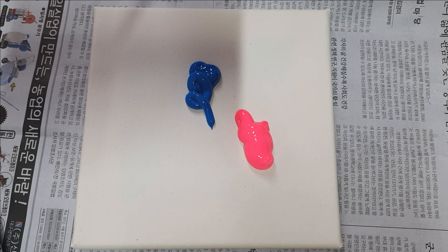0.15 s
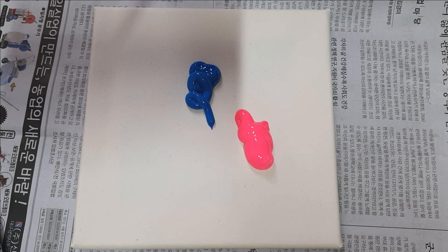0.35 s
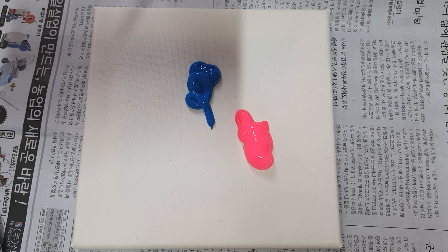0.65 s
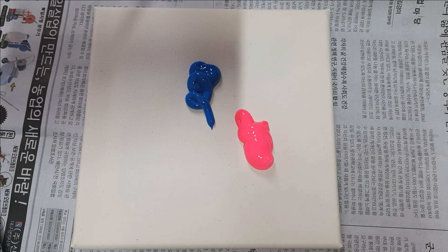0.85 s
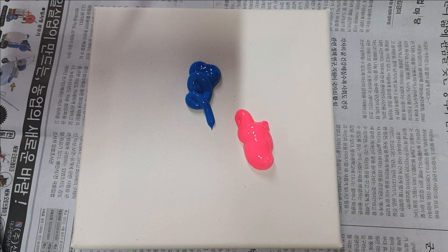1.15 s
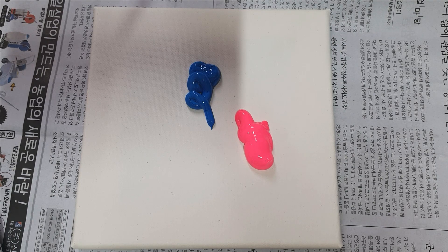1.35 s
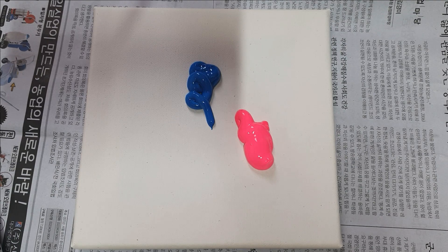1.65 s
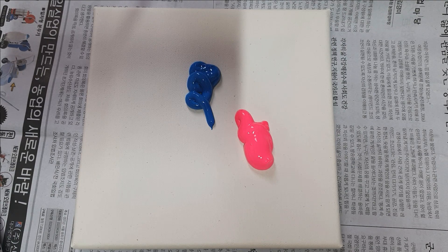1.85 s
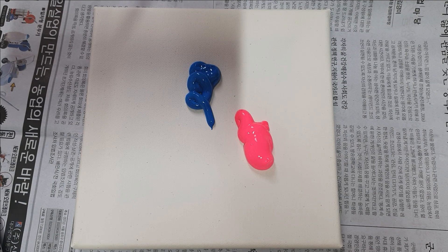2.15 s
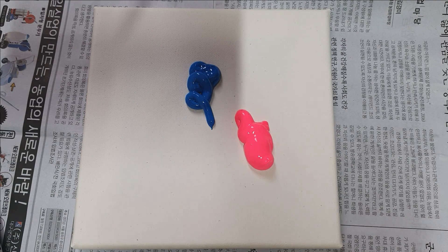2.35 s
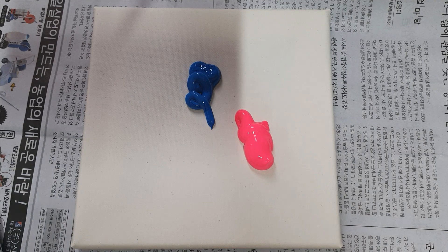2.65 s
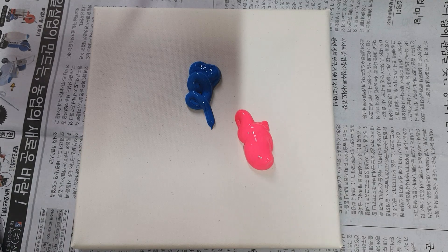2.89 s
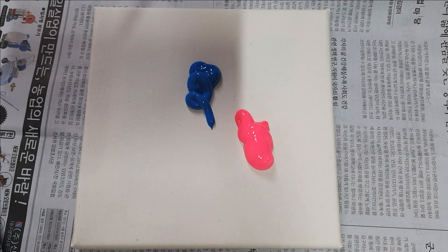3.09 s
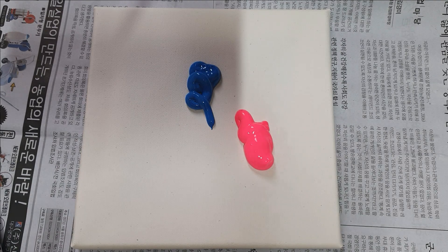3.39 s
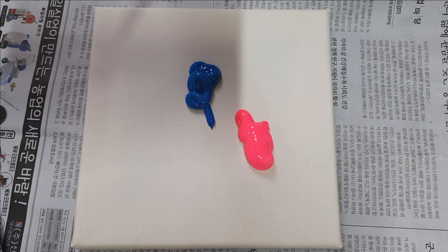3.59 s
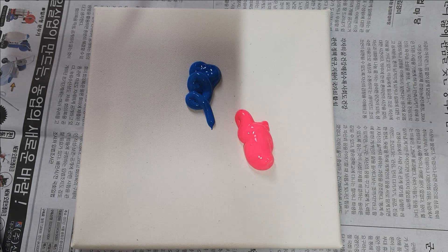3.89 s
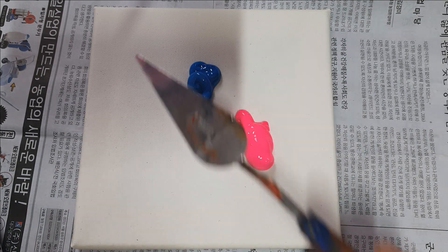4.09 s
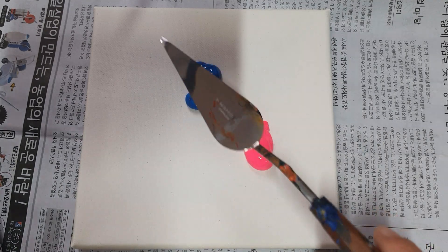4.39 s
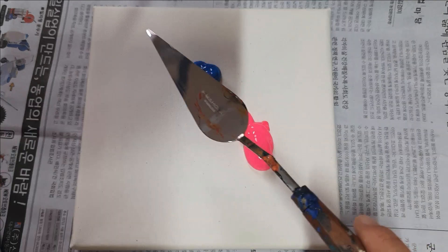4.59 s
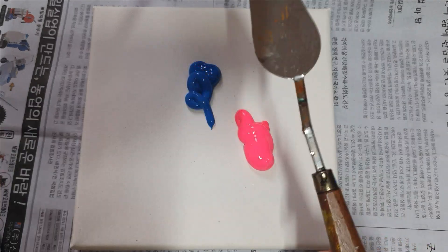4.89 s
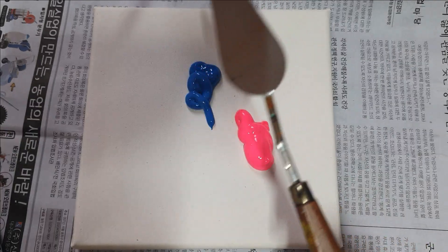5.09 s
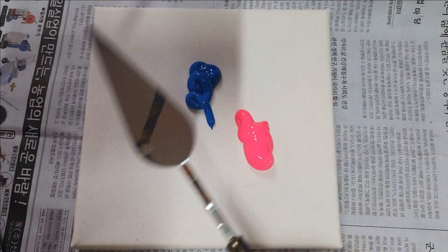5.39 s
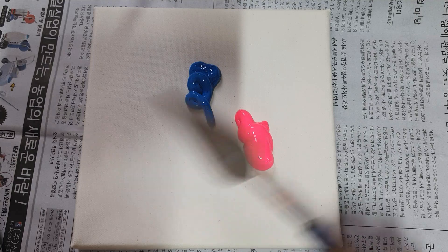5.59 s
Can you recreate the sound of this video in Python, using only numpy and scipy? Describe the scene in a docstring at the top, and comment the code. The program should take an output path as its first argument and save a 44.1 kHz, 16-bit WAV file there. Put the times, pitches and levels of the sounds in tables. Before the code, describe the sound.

A fading metallic clink opens, then thin steel palette knives with wooden handles knock and chatter together in irregular clusters, with tiny scrapes and soft desk thuds. After a short pause the hits get sharper and louder, then stop. Close stereo phone microphone, knives nearer the right, small quiet room with low hum and hiss.

```python
"""A fading clink is heard first; then wooden-handled steel palette knives knock on a desk, right of a phone.
Each knock is a short chatter of contacts exciting the damped modes of handles and blades; some blades ring on.
Blades slide as dense contacts exciting the same modes, fingers brush as filtered noise, the desk booms in
low modes. A small quiet room adds a noise tail, a low hum and the microphones' own hiss."""
import sys
import numpy as np
from scipy import signal
from scipy.fft import rfft, irfft
from scipy.io import wavfile
from scipy.ndimage import uniform_filter1d

SR = 44100
rng = np.random.default_rng(int(sys.argv[2]) if len(sys.argv) > 2 else 0)


def to_wav(s):
    """Save 16-bit WAV."""
    ch = np.atleast_2d(s).T  # columns
    pcm = np.round(np.clip(ch, -1, 1) * 32767)  # PCM
    wavfile.write(sys.argv[1], SR, pcm.astype(np.int16))


N = 253134  # length in samples

# Steel meeting steel. Each row: start in seconds, opening level in dB, contact pitch in Hz, handle pitch in Hz,
# handle level in dB over the contact, treble level in dB over the contact, chatter time constant in ms.
KNOCKS = [(.142, -49.5, 3250, 1700, 3, 4.5, 4), (0.216, -39, 2560, 1500, -4, -9.5, 5.7),
          (.227, -40, 3407, 1110, 8.5, -3, 22), (.239, -30, 3546, 1260, 3.5, -0.5, 5.3),
          (.397, -42.5, 3540, 1800, 8, -4, 5.8), (.434, -48.5, 3640, 1140, -4, -16, 3.7),
          (.493, -48, 3140, 1770, -13, -34, 1.2), (0.514, -35, 1630, 1700, 12, -23.5, 0.95),
          (.546, -38.5, 3900, 1520, -5, -4.5, 11), (.766, -55.5, 3660, 1760, 5, -9, 5),
          (.817, -62.5, 3400, 1570, -4, 1, 3), (0.859, -31, 3480, 1580, -4, 0.5, 3.3),
          (.877, -33, 2710, 1670, 2, 4.5, 6.5), (1.251, -27.5, 2600, 1260, -4, -1, 3.7),
          (1.277, -43, 2540, 1800, -4, -1, 2.5), (1.394, -27, 2585, 1800, -6, -2, 3.1),
          (1.536, -33, 2676, 1770, -13, -6, 2.1), (1.721, -34.5, 3463, 1150, -4, 2.5, 7.4),
          (1.784, -32, 3450, 1100, 9, 2, 3.3), (1.862, -36.5, 2670, 1440, 16, 8, 8.8),
          (1.876, -37, 3330, 1800, 1, -12, 2.4), (1.986, -56.5, 1800, 1810, 7, -10, 3),
          (2.675, -16.5, 3654, 1550, 1, -4.5, 0.49), (2.85, -26, 3430, 1770, 0.5, -1, 2.35),
          (2.995, -23.5, 3605, 1500, 2, -7, 7), (3.148, -17.5, 4630, 1920, 3.5, -6.5, 2.1),
          (3.229, -47, 3000, 1140, -7, 0, 3.4), (3.285, -31.5, 3550, 1670, 11, 1.5, 5.2),
          (3.293, -35, 2540, 1480, 2, -6, 2.7), (3.324, -41, 4680, 1700, -2, 14, 16.5),
          (3.514, -21.5, 4490, 1730, -5.5, 0.5, 3.2), (3.522, -22.5, 3610, 1340, 1.5, -7, 1.47),
          (3.684, -33, 2535, 1100, 7, -2, 3.2), (4.01, -58, 3610, 1420, -14, -14, 1.45)]
# Rebound strength in dB re the first blow, before its scatter and fade; colour slopes and contact peak.
REBOUND_DB, HANDLE_FALL_DB_PER_OCT, EDGE_DB = -1.5, 10.5, -2
CONTACT_LIFT_DB, CONTACT_OCT = 4, 0.16

# Modes of knives held in the hand. Each row: frequency in Hz, level in dB, t60 in seconds.
HELD_MODES = [(1120, 6, .035), (1190, -1, .03), (1384, -3, .06), (1730, 7, .04), (1850, 3, .035),
              (2606, -6, .04), (2940, -10, .04), (3117, -10, .04), (3440, -6, .04), (3601, -6, .04),
              (4180, -10, .03), (4554, -9, .04), (5631, -13, .03), (8710, -14, .05), (9781, -16, .05)]
RATTLE_ALIKE = .45  # correlation of the left and right rattle noise

# Thin blades ringing until a touch damps them; the grip bends the first mode. Each row: start in seconds,
# blade name, time to damping in seconds, first mode in Hz, first mode gain in dB, upper modes gain in dB.
RINGS = [(.88, "slim", 0.11, 3550, -70, -46.5), (1.252, "slim", 0.1, 3420, -80, -40.5),
         (1.396, "broad", 0.099, 3500, -80, -53), (1.724, "slim", 0.06, 3440, -51, -34.5),
         (1.785, "slim", 0.083, 3440, -51, -53), (2.676, "slim", 0.022, 3520, -33, -60),
         (2.851, "slim", 0.036, 3461, -71, -37), (2.852, "broad", 0.16, 3461, -55, -48),
         (2.997, "slim", 0.049, 3455, -65, -30.5), (2.998, "broad", .1, 3455, -68.5, -46.5),
         (3.149, "slim", 0.18, 3630, -52.5, -36), (3.287, "slim", 0.04, 3600, -73, -35),
         (3.335, "broad", 0.2, 3499, -58.5, -42.5), (3.516, "slim", 0.2, 3542, -47, -31.5),
         (3.517, "broad", .16, 3542, -70, -33), (3.685, "slim", 0.16, 3570, -58, -60)]
# Upper modes of the two free blades, by name. Each row: frequency in Hz, level in dB, t60 in seconds.
BLADE_MODES = {"broad": [(6800, 0, .25), (8800, -18, 0.16), (10200, -14, 0.142)], "slim": [(7079, -8.5, .4),
               (7108, 1, .32), (8680, -7.5, .14), (9810, -16.5, .12)]}
# A lower blade mode: frequency in Hz, level in dB over the first mode, t60 in seconds.
BLADE_BASE = (1400, -11, .35)
BLADE_FIRST_T60_S = .5
BLADE_LEFT_DB, BLADE_LEFT_S = -6, .000056  # gain and delay of the ring at the left

# Modes of a clink still fading at the start. Each row: frequency in Hz, level in dB, t60 in seconds.
CLINK = [(4180, -3, 0.46), (4800, 1.5, 0.19), (5700, -13, 0.31), (6080, 1.5, 0.3), (7537, -6, 0.42),
         (9437, -16, 5.7), (14500, -17, 0.23), (14790, -16, 0.17)]
CLINK_DB = -60.5

# A knife comes down on the desk. Each row: start in seconds, gain in dB.
THUDS = [(0.216, -49), (0.228, -37.5), (0.239, -39), (0.396, -53), (0.543, -45), (1.394, -47), (1.721, -56),
         (1.784, -50), (2.674, -46), (2.85, -48.5), (2.998, -48), (3.148, -39), (3.285, -49.5),
         (3.519, -46), (3.682, -54)]
# Modes of the desk top. Each row: frequency in Hz, level in dB, t60 in seconds.
DESK_MODES = [(145.2, 0, 0.086), (190, -5, 0.1), (290, -6.5, 0.056), (450, -7, .05), (563, -3.5, .04)]

# Blades sliding on each other. Each row: start in seconds, length in seconds, level in dB,
# brightness in dB per octave, contact pitch in Hz.
SLIDES = [(0.237, 0.11, -56, -1.5, 2830), (0.324, 0.027, -47.5, -2.5, 2650),
          (0.522, 0.026, -56.5, -6, 1510), (0.546, 0.054, -45, -3, 1020), (0.752, 0.12, -66.5, 4, 3600),
          (0.887, 0.053, -51, 15.5, 5230), (1.255, 0.033, -56.5, -2, 2610), (3.154, 0.04, -41, -0.5, 1720),
          (3.2, 0.082, -61, 10, 2800), (3.316, 0.035, -48, 6.5, 4530)]
# Fingers brushing dry. Each row: start in seconds, length in seconds, level in dB, centre in Hz.
BRUSHES = [(1.883, 0.15, -81, 10200), (1.994, 0.23, -70.5, 9700), (2.571, 0.045, -75.5, 7000),
           (4.0, 0.045, -77, 7000), (4.6, 0.04, -77.5, 6950), (4.844, 0.038, -79.5, 8870)]

# Shading of the left microphone by the phone body. Each row: frequency in Hz, gain in dB.
LEFT_SHADE = [(200, -1), (800, -6), (1100, -7.5), (1400, -1), (1750, -10), (2600, -6), (6000, -4),
              (9000, -9), (12000, -11), (16000, -9)]
# Phase turn at the left around the phone's edge, beyond the lag. Each row: frequency in Hz, turn in radians.
LEFT_TURN = [(1150, 0), (1400, .5), (1750, -1.5), (2600, .7), (3600, -.7), (5000, 0)]
LEFT_LAG_S = .00031

TAIL_DB, TAIL_T60_S, TAIL_DELAY_S = -7, .1, .003
TAIL_LOW_HZ = 1940  # under this the tail thins out

# Spectrum of the room tone. Each row: frequency in Hz, relative density in dB per Hz.
ROOM = [(12, -68), (20, -38), (74, -5.5), (91, 2), (116, -11), (216, -17), (262, -8.5), (574, -26),
        (802, -16.5), (949, -24), (1090, -21), (1400, -24.5), (1960, -24), (6360, -35), (16000, -58.5)]
# Likeness of the two microphones. Each row: frequency in Hz, correlation of left and right.
ROOM_ALIKE = [(60, .86), (290, .82), (640, .65), (1400, .04), (16000, .0)]
# Broad bends of the room tone's spectrum. Each row: centre in Hz, half width in Hz,
# gain in dB, negative for a dip.
ROOM_BENDS = [(90, 25, -2), (276.5, 50, -3.5), (800, 48, 2.5)]
ROOM_DB, ROOM_LEFT_DB = -64, -0.5

TOP_HZ = 16200


def undb(db):
    """Decibels express a ratio of amplitudes; return that ratio."""
    return 10 ** (np.asarray(db) / 20)


def over_hz(points, hz):
    """Interpolation on a logarithmic frequency axis, of (Hz, value) points."""
    f, v = np.transpose(points)
    return np.interp(np.log(hz + 1), np.log(f), v)


def shape(x, gain):
    """Linear filtering: the spectrum of x is multiplied by a gain given as a function of frequency."""
    n = x.shape[-1]
    hz = np.arange(n // 2 + 1) * SR / n
    return irfft(rfft(x) * gain(hz), n)


def ring(modes, size, scatter_db=0., detune=0.):
    """Modal superposition: decaying sines; each blow lands elsewhere, so gains and pitches scatter."""
    hz, db, t60 = np.transpose(modes)[:, :, None]
    gain_luck, pitch_luck = rng.standard_normal((2, len(modes), 1))
    t = np.arange(size) / SR
    fade = np.exp(-np.log(1000) * t / t60)
    wave = np.sin(2 * np.pi * hz * (1 + detune * pitch_luck) * t)
    return np.sum(undb(db + scatter_db * gain_luck) * fade * wave, axis=0)


def clicks(size, rate, spread_db):
    """Random impulse train: tiny contacts, rate per second, a few much stronger than the rest."""
    when, sign, big = rng.random((3, size))
    strength = undb(-spread_db * np.log(1 - big))
    return (when < rate / SR) * np.sign(sign - .5) * strength


def add(track, x, s):
    """Superposition: x is summed into the track from time s in seconds."""
    i = int(s * SR)
    track[..., i:i + x.shape[-1]] += x[..., :track.shape[-1] - i]


def held_knife(force, contact_hz):
    """Forced response: contacts crack, rattle a crowd of damped modes and ring the few clear ones."""
    t = np.arange(4096) / SR
    clear = ring(HELD_MODES, size=len(t), scatter_db=2.5, detune=.008)
    clear += ring([(contact_hz, 6, .035)], size=len(t))

    right, other = rng.standard_normal((2, len(t)))
    left = RATTLE_ALIKE * right + np.sqrt(1 - RATTLE_ALIKE ** 2) * other
    bright = np.array([left, right])
    # the treble of the rattle dies first
    dull = shape(bright, lambda hz: 1 / np.sqrt(1 + (hz / 21000) ** 2))
    rattle = undb(20.5) * np.exp(-t / .0023) * bright
    rattle += undb(-3) * np.exp(-t / .015) * dull
    rattle[:, 0] += undb(15)  # the crack
    # modes crowd only in the treble; lower down the clear ones stand alone
    rattle = signal.lfilter(*signal.butter(2, 1800, "high", fs=SR), rattle)

    fade_out = np.cos(np.pi / 2 * t / t[-1])
    return signal.fftconvolve(force[None], (clear + rattle) * fade_out, axes=1)


def knock_colour(hz, contact_hz, handle_hz, handle_db, treble_db):
    """Radiation: small knives radiate little under 1 kHz; handle, contact and treble set the gain above."""
    octaves_off = np.abs(np.log2(np.array([1100, 1800]) / handle_hz))
    low_db, mid_db = handle_db - HANDLE_FALL_DB_PER_OCT * octaves_off
    edge_db = treble_db + EDGE_DB
    colour = [(300, low_db - 26), (800, low_db - 8), (1100, low_db), (1800, mid_db), (3300, 0),
              (7000, treble_db), (12000, edge_db), (16000, edge_db - 12)]
    octaves = np.log2((hz + 1) / contact_hz)
    lift_db = CONTACT_LIFT_DB * np.exp(-(octaves / CONTACT_OCT) ** 2)
    return undb(over_hz(colour, hz) + lift_db)


def knocks():
    """Repeated impact: a first blow and a fading chatter of rebounds drive the held knives."""
    out, t = np.zeros((2, N)), np.arange(4096) / SR
    lead = 64  # samples of silence ahead of the blow, room for the filter's spread
    for s, db, contact_hz, handle_hz, handle_db, treble_db, fade_ms in KNOCKS:
        chatter = clicks(size=len(t), rate=2500, spread_db=3)
        force = undb(REBOUND_DB) * chatter * np.exp(-1000 * t / fade_ms)
        force[0] = 1
        hit = np.pad(held_knife(force, contact_hz), ((0, 0), (lead, 0)))
        hit = shape(hit, lambda hz: knock_colour(hz, contact_hz, handle_hz, handle_db, treble_db))
        # the level is set over the first 6 ms, lead included
        add(out, undb(db) * hit / np.std(hit[:, :256]), s - lead / SR)
    return out


def blade_rings():
    """Free vibration: a blade's long clear modes build within ms and are cut short by the next touch."""
    out, t = np.zeros(N), np.arange(16384) / SR
    for s, name, free_s, first_hz, first_db, upper_db in RINGS:
        low_modes = [(first_hz, 0, BLADE_FIRST_T60_S), BLADE_BASE]
        tone = undb(first_db) * ring(low_modes, size=len(t))
        tone += undb(upper_db) * ring(BLADE_MODES[name], size=len(t), detune=.001)
        onset = 1 - np.exp(-t / .003)
        touch = np.exp(-np.clip(t - free_s, 0, None) / .012)
        add(out, tone * onset * touch, s)
    return out


def fading_clink():
    """Modal decay: a clink fades from the start and dies quickly after 0.13 s."""
    out, t = np.zeros(N), np.arange(16384) / SR
    damping = np.exp(-np.clip(t - .13, 0, None) / .0077)
    add(out, undb(CLINK_DB) * ring(CLINK, size=len(t)) * damping, 0)
    return out


def free_steel():
    """Directivity: one face to each microphone; the left ring is weaker and late, high modes inverted."""
    right = blade_rings() + fading_clink()
    left = shape(right, lambda hz: undb(BLADE_LEFT_DB) * np.exp(-2j * np.pi * hz * BLADE_LEFT_S))
    return np.array([left, right])


def thuds():
    """Plate modes: the desk top booms briefly as a knife comes down."""
    out, t = np.zeros(N), np.arange(8192) / SR
    onset = 1 - np.exp(-t / .002)
    for s, db in THUDS:
        boom = ring(DESK_MODES, size=len(t), detune=.022)
        add(out, undb(db) * boom * onset, s)
    return out


def slides():
    """Stick-slip friction: steel catching on steel sends dense uneven clicks into the held modes."""
    out = np.zeros((2, N))
    for s, length, db, tilt_db, contact_hz in SLIDES:
        n = int(length * SR)
        swell = np.sin(np.linspace(.5, np.pi, n))
        force = clicks(size=8192, rate=1300, spread_db=4.5)[:n] * swell

        def colour(hz):
            tilt = undb(tilt_db * np.log2((hz + 50) / 3500) - (hz / 1900) ** 2)
            low_cut = hz ** 2 / (hz ** 2 + 700 ** 2)
            return tilt * low_cut

        sound = shape(held_knife(force, contact_hz), colour)
        add(out, undb(db) * sound / np.std(sound[:, :n]), s)
    return out


def brushes():
    """Friction noise: skin on wood and steel gives a soft high hiss."""
    out = np.zeros(N)
    for s, length, db, centre_hz in BRUSHES:
        n = int(length * SR)
        grain = rng.standard_normal(16384)[:n] * np.hanning(n) ** .5
        hiss = shape(grain, lambda hz: np.exp(-(np.log2((hz + 1) / centre_hz) / .6) ** 2))
        add(out, undb(db) * hiss / np.std(hiss), s)
    return out


def room_tail(near):
    """Diffuse reverberation: desk and walls answer each microphone with its own decaying noise."""
    t = np.arange(8192) / SR
    decay = np.exp(-np.log(1000) * t / TAIL_T60_S) * (t > TAIL_DELAY_S)
    echo = rng.standard_normal((2, len(t))) * decay
    echo = shape(echo, lambda hz: hz / np.hypot(hz, TAIL_LOW_HZ))
    energy = np.sum(echo ** 2, axis=1, keepdims=True)
    echo *= undb([[TAIL_DB - 1.5], [TAIL_DB]]) / np.sqrt(energy)
    return signal.fftconvolve(near, echo, axes=1)[:, :N]


def room_tone():
    """Spatial coherence: hum and air alike in the bass, unrelated hiss above; the level swells a little."""
    def level(hz):
        bend_db = sum(db / (1 + ((hz - f) / w) ** 2) for f, w, db in ROOM_BENDS)
        return undb(over_hz(ROOM, hz) + bend_db)

    mid = shape(rng.standard_normal(N), lambda hz: level(hz) * np.sqrt(1 + over_hz(ROOM_ALIKE, hz)))
    side = shape(rng.standard_normal(N), lambda hz: level(hz) * np.sqrt(1 - over_hz(ROOM_ALIKE, hz)))
    pair = np.array([undb(ROOM_LEFT_DB) * (mid + side), mid - side])
    steps = np.repeat(rng.standard_normal(N // 8000 + 1), 8000)[:N]
    swell = uniform_filter1d(steps, size=8000)
    return pair * undb(ROOM_DB + 2.1 * swell) / np.std(mid)


def left_path(hz):
    """Diffraction: sound reaches the left microphone late, shaded and turned in phase by the phone."""
    phase = over_hz(LEFT_TURN, hz) - 2 * np.pi * hz * LEFT_LAG_S
    return undb(over_hz(LEFT_SHADE, hz)) * np.exp(1j * phase)


def scene():
    """Superposition: direct sound, right microphone first, then its tail, the free steel and the room."""
    near = knocks() + thuds() + slides() + brushes()
    direct = np.array([shape(near[0], left_path), near[1]])
    return direct + room_tail(near) + free_steel() + room_tone()


def record(dry):
    """Band limiting: the phone cuts the top with a steep low-pass."""
    low_pass = signal.ellip(10, .2, 80, TOP_HZ, fs=SR, output="sos")
    return signal.sosfilt(low_pass, dry)


dry = scene()
out = record(dry)
to_wav(out)
```